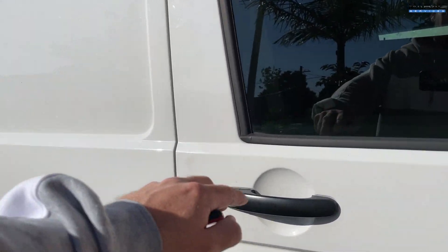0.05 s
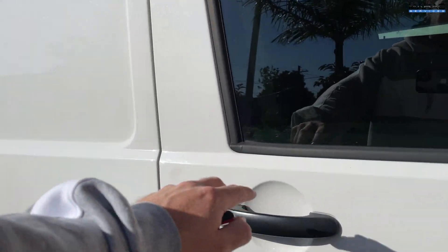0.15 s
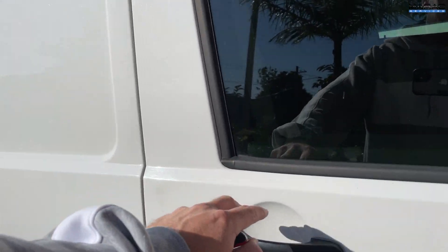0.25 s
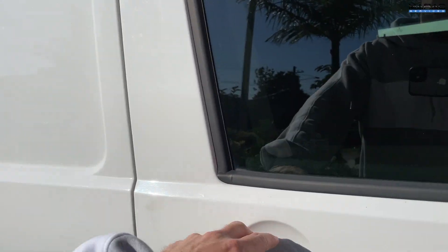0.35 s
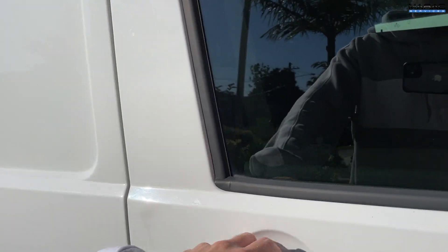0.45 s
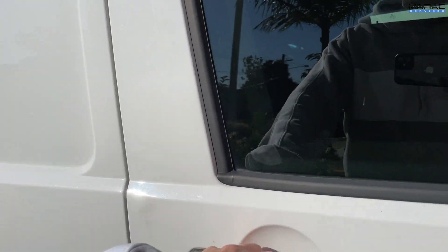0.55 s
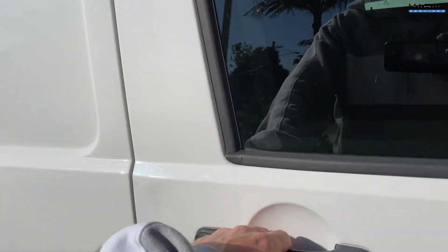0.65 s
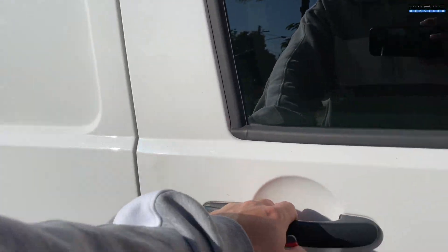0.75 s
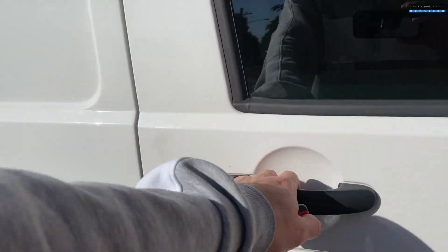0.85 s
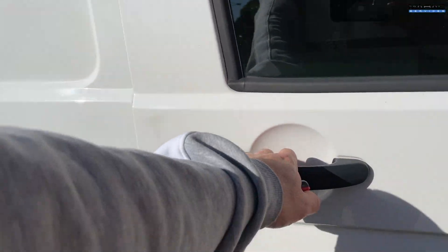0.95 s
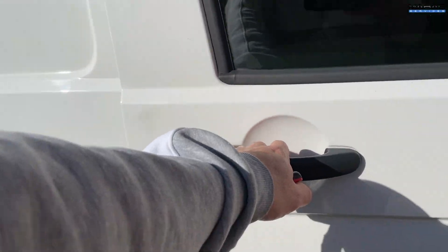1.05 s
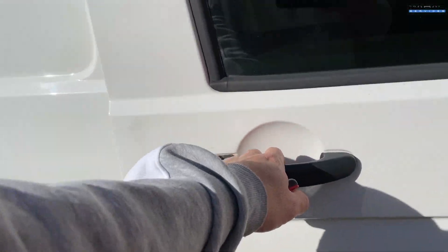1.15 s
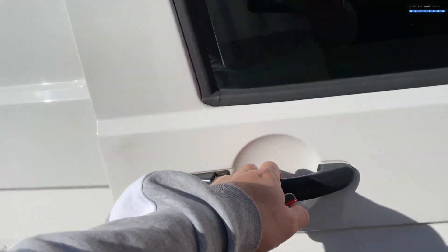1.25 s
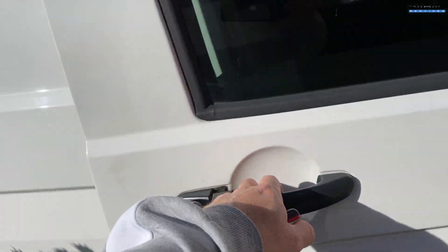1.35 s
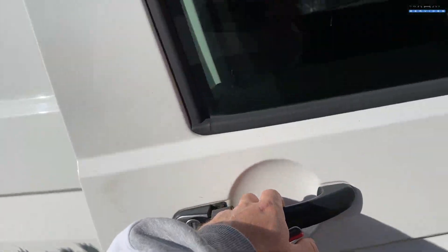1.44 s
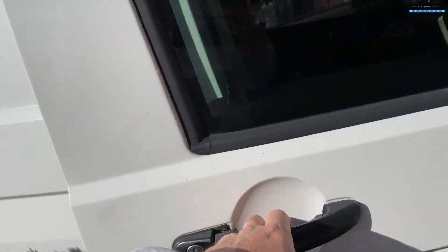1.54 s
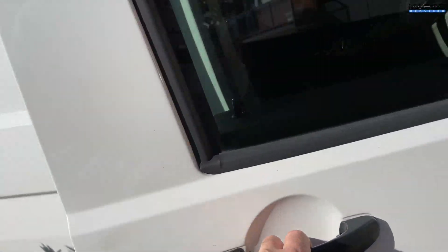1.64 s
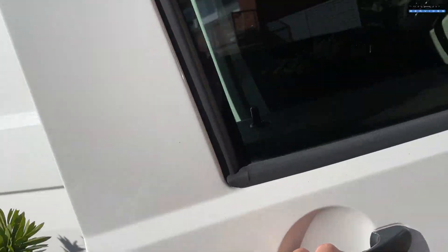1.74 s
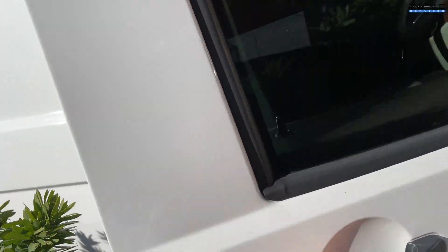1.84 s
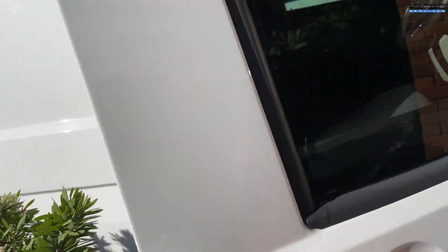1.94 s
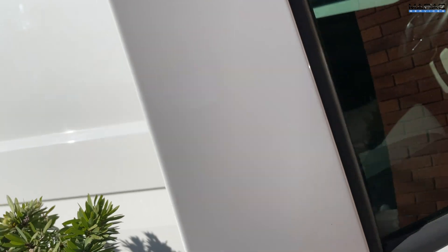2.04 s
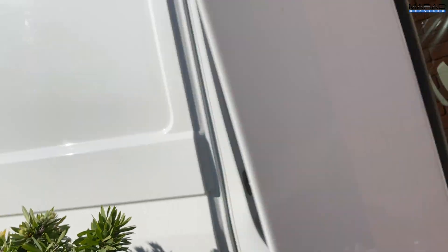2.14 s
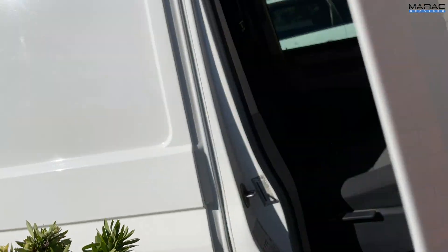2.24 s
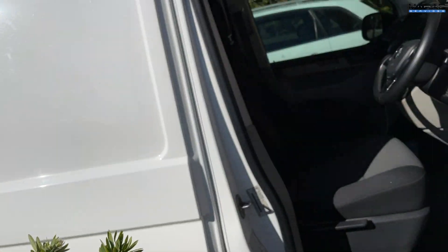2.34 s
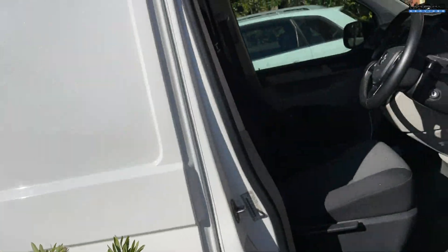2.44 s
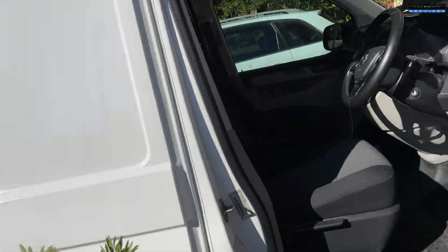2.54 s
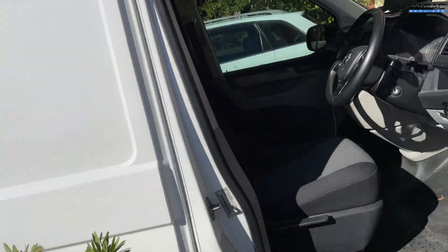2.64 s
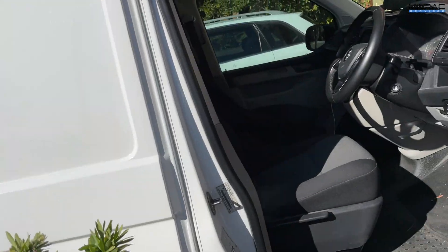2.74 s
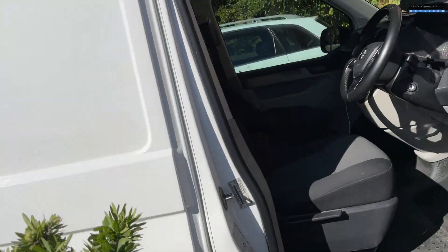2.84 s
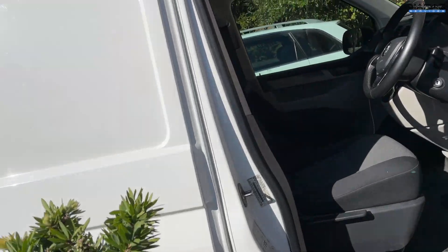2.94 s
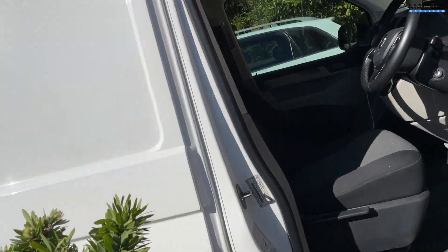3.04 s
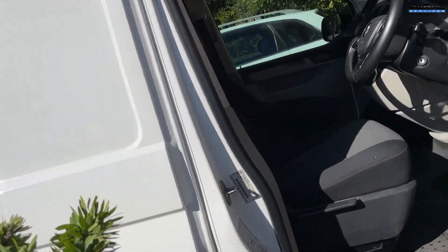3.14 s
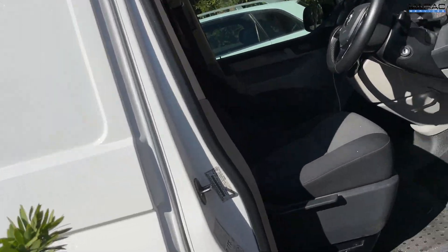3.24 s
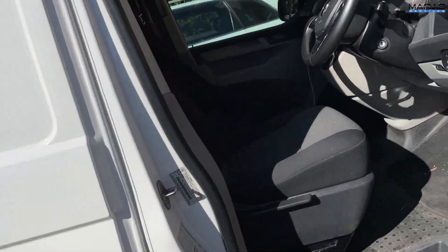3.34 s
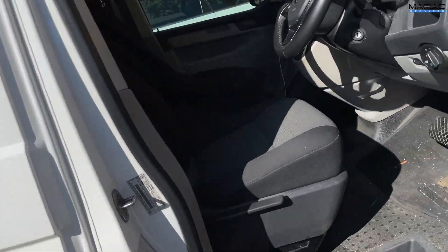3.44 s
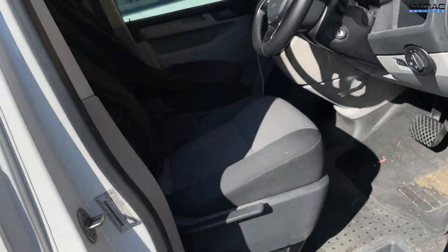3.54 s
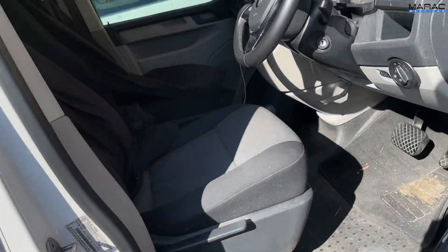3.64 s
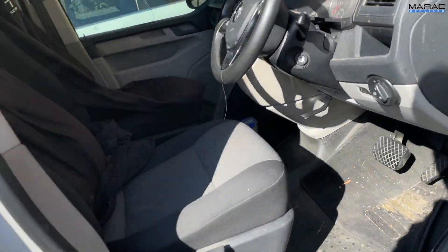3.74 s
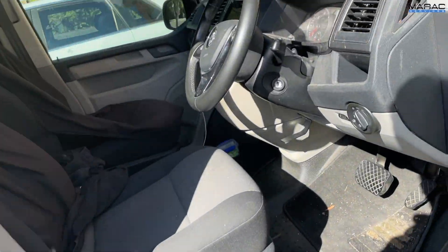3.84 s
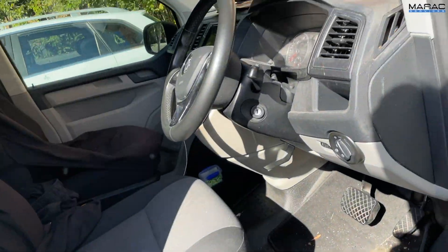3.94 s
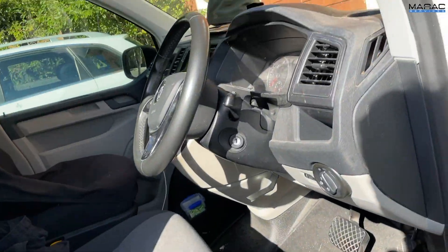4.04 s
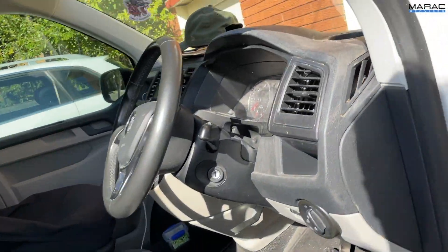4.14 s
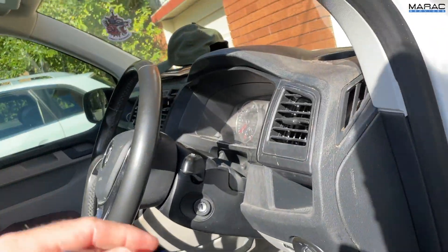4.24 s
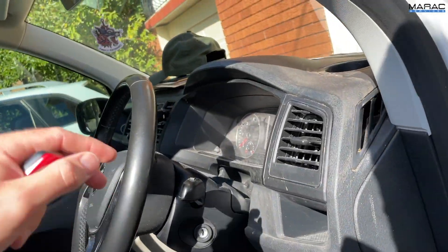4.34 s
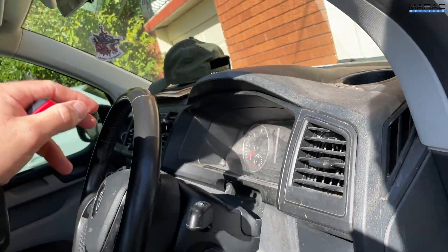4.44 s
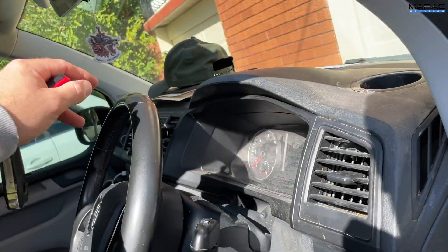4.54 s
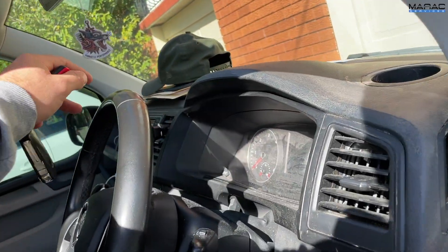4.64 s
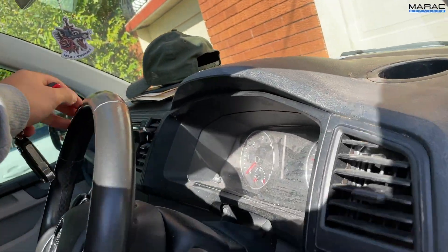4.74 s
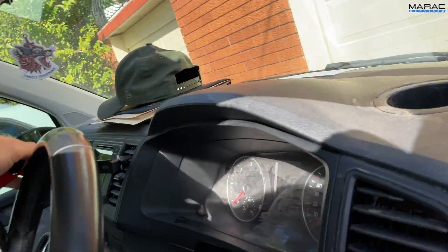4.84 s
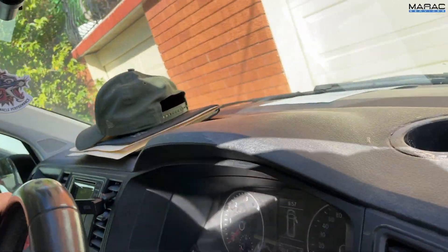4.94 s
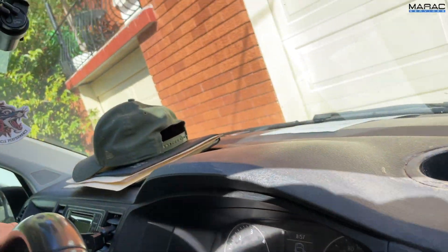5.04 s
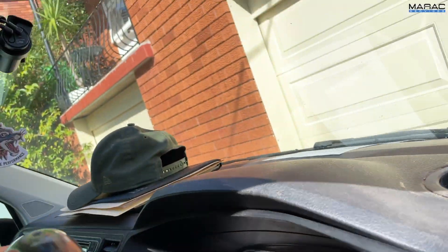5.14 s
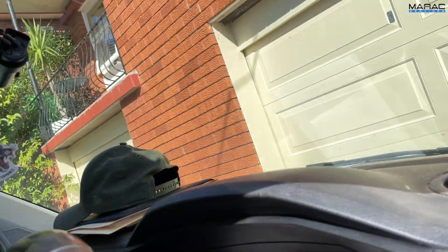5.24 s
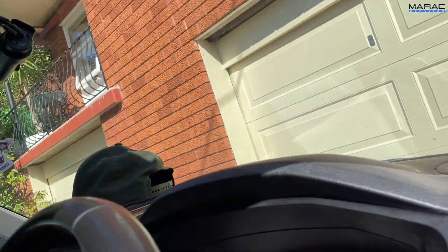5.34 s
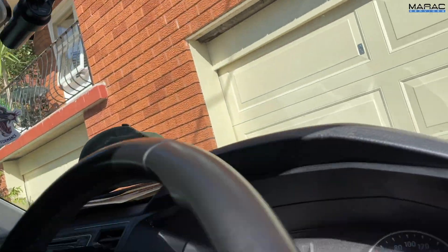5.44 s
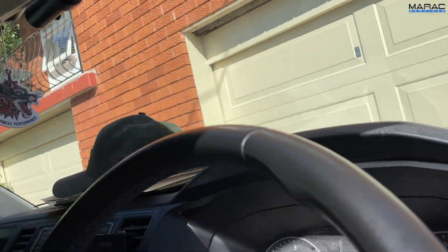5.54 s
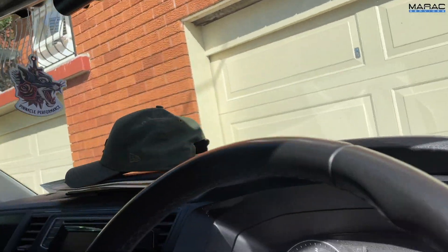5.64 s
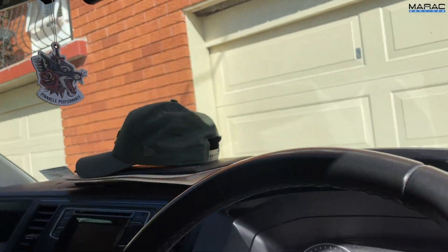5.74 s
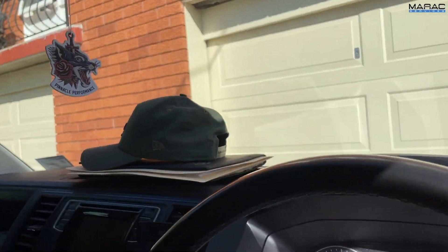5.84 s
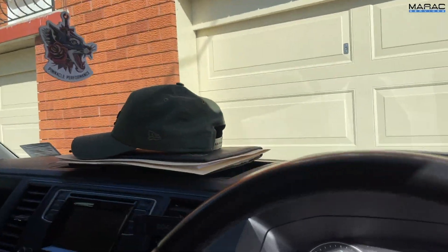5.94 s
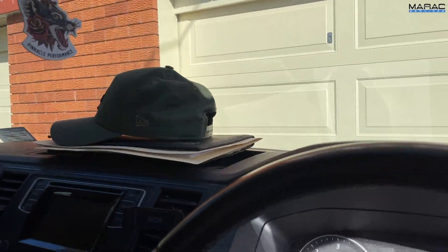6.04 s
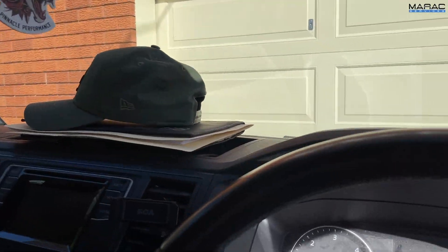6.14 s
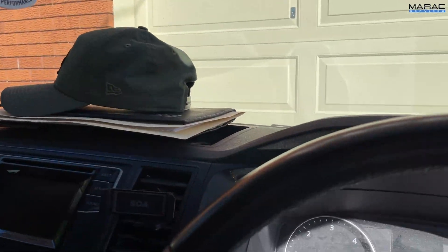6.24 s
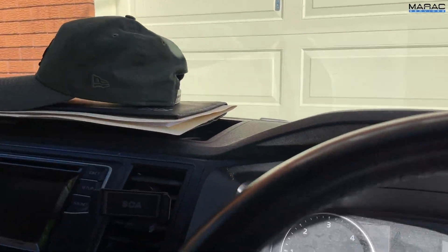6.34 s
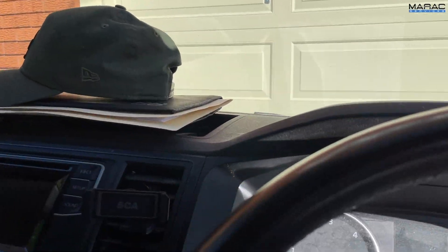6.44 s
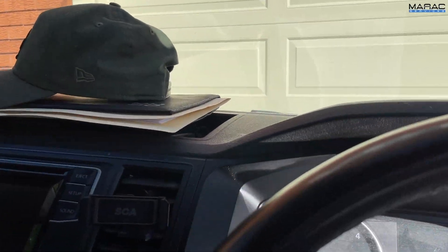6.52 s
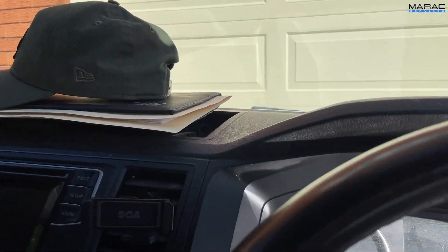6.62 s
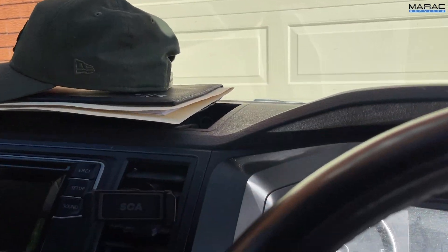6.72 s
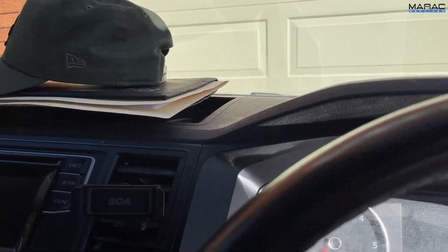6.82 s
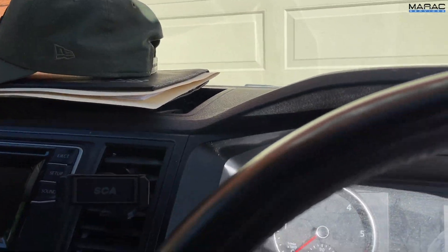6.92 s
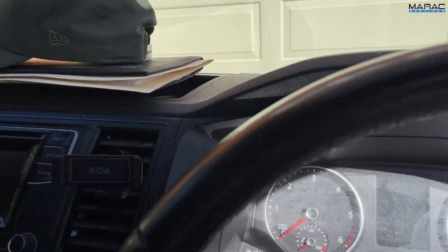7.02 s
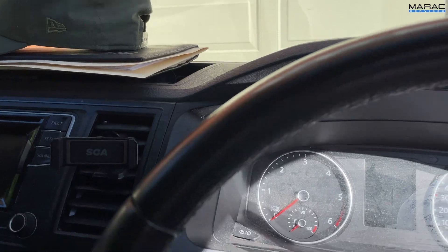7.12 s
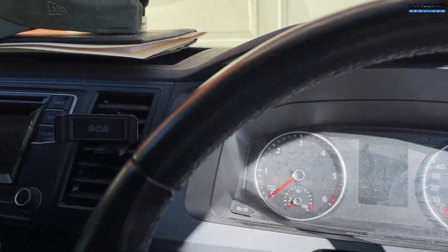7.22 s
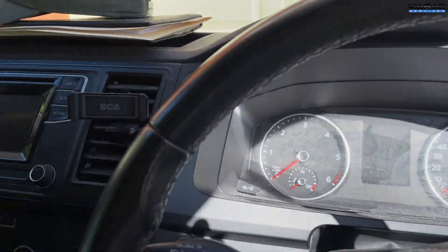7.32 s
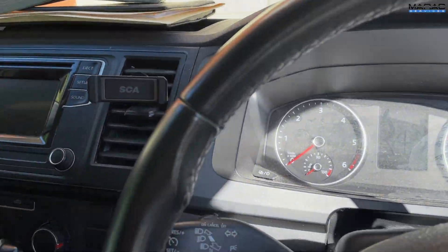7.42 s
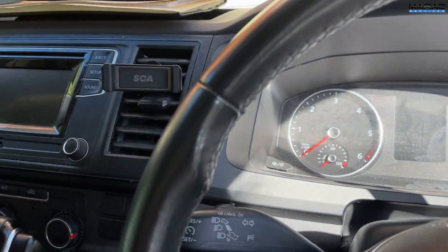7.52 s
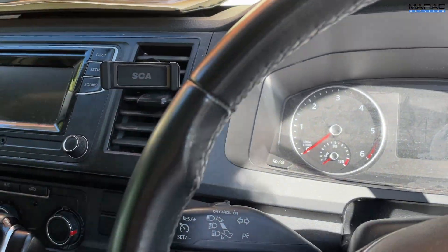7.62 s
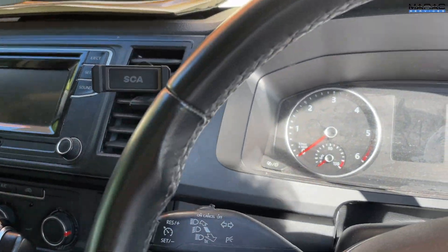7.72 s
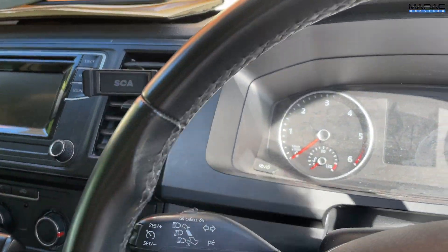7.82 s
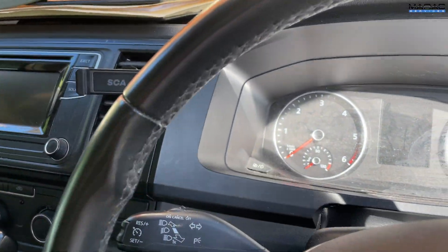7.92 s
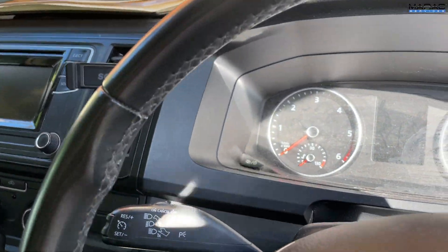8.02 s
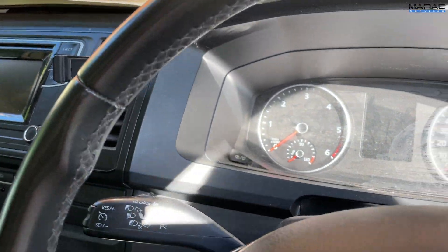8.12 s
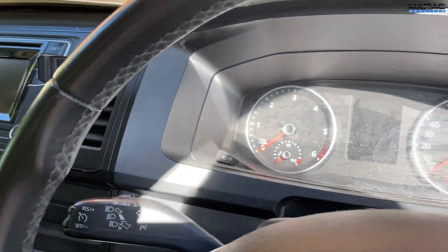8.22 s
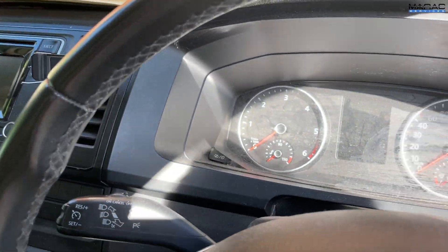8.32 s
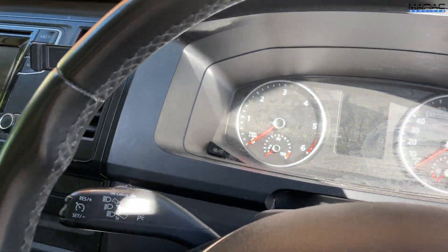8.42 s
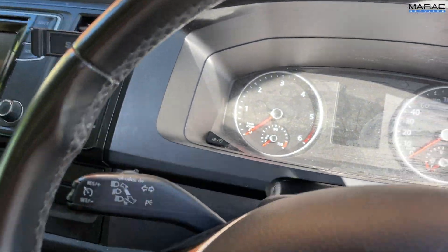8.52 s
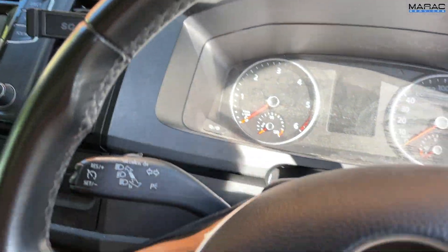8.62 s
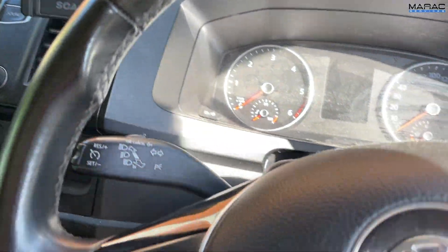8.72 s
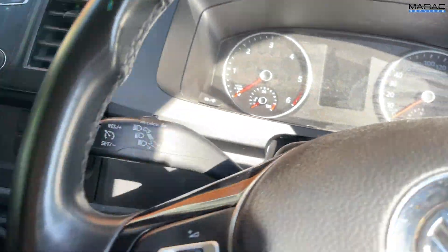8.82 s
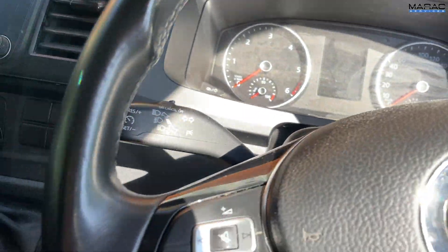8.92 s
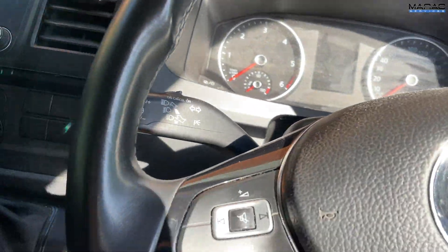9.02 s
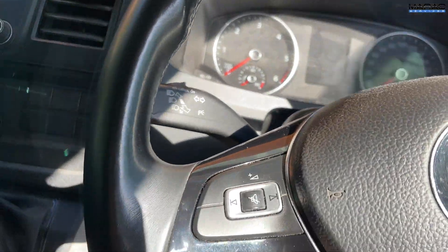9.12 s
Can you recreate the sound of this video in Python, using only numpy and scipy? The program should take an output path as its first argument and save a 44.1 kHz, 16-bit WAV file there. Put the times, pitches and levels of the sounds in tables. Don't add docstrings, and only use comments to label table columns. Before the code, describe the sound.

Van door latch clacks open, then knocks, a gritty scrape and loud thumps as someone climbs into the seat, with faint street noise and rustling cloth.

```python
import sys
import numpy as np
from scipy import signal
from scipy.fft import rfft, irfft, next_fast_len
from scipy.io import wavfile
from scipy.ndimage import uniform_filter1d

SR = 44100
rng = np.random.default_rng(int(sys.argv[2]) if len(sys.argv) > 2 else 0)


def undo_db(level):
    steps = np.asarray(level, float) / 20
    return 10 ** steps


def unload_audio(sound):
    columns = np.transpose(np.atleast_2d(sound))
    steps = np.round(np.clip(columns, -1, 1) * 32767)
    wavfile.write(sys.argv[1], SR, steps.astype(np.int16))


N = 404397
PADDED = next_fast_len(N + 4096)

# start_s [s], level_db [dB]
LATCH_CONTACTS = [
    (0.896, -24),
    (0.9, -4.5),
    (0.9028, -7),
    (.907, -14),
    (0.9098, -15.5),
    (0.9224, -29),
]
# pitch_hz [Hz], level_db [dB], t60_s [s]
DOOR_MODES = [(81.4, -9.5, 0.099), (200, -12.5, 0.22), (400, -8.5, 0.085), (440, -9, 0.066),
              (674, -11, 0.073), (743, -10, 0.09), (2180, -22, 0.1), (1130, -22.5, 0.034),
              (1350, -15.5, 0.04), (1706, -23, 0.12), (2371, -21, 0.15), (2585, -23, 0.11)]
# pitch_hz [Hz], level_db [dB], t60_s [s]
DOOR_TAIL = [(57.5, -25.5, 0.5), (150, -21.5, 0.45), (430, -23, 0.33), (980, -18.5, 0.051),
             (2500, -17, 0.053), (5000, -39.5, 0.11), (9000, -62, .1)]

# start_s [s], pitch_hz [Hz], level_db [dB], t60_s [s]
SINGLE_SWINGS = [(.9015, 75, -11, .1), (.8975, 388, -8, .06), (.905, 452, -14, .04), (.921, 194, -18, .15),
                 (.945, 83, -18, .25), (4.9735, 120, -4, 0.031), (1.934, 390, -18, .06),
                 (1.933, 850, -24, .06), (2.1, 320, -31, .07), (.558, 200, -34, 0.11),
                 (2.777, 116.5, -26, 0.06), (3.05, 326, -23.5, 0.11), (4.475, 170, -30.5, 0.09),
                 (5.483, 90, -24.5, 0.1), (5.632, 90, -22, 0.09), (6.757, 990, -36, .04),
                 (7.095, 82, -36, 0.16), (7.924, 414, -42, 0.039), (8.665, 320, -19.5, 0.053),
                 (8.912, 89.5, -27.5, .12), (9.104, 190, -21, 0.062), (0.55, 480, -31.5, 0.11),
                 (8.662, 760, -14.5, 0.045), (8.683, 760, -15, 0.04), (2.771, 1550, -24.5, 0.028),
                 (2.772, 1750, -28.5, 0.033), (3.76, 560, -12, 0.06), (1.681, 390, -29, 0.06),
                 (3.392, 290, -22, .13), (4.684, 150, -18, .03), (5.2, 520, -28, .04), (5.35, 550, -29, .06),
                 (5.093, 520, -17, .04), (1.004, 750, -25, .045), (4.365, 500, -26, .045),
                 (4.373, 162, -30, .11), (4.469, 426, -24, 0.049), (3.451, 633, -11, 0.036),
                 (.538, 1650, -30.5, .03), (3.331, 480, -9, .025), (9.097, 850, -31, .06),
                 (8.835, 1500, -42, 0.071), (8.138, 1990, -40, .03)]

# start_s [s], peak_db [dB], body_hz [Hz], upper_db [dB re peak], crack_db [dB re peak]
PANEL_KNOCKS = [(0.427, -25.5, 144.6, -20.5, -33), (0.811, -35.5, 154.4, -12, -13.5),
                (1.324, -29, 102, -17, -28), (1.503, -13.5, 225, -15.5, -29.5),
                (1.683, -24.5, 216, -21.5, -45), (1.959, -21.5, 116.5, -8.5, -56.5),
                (2.469, -27.5, 464, -4, -15.5), (4.255, -31.5, 295, -5, -27), (4.552, -29, 259, -11.5, -37),
                (4.762, -27, 193, -4.5, -10.5), (5.331, -22, 166.4, -16, -38), (6.552, -30, 159, -17, -26),
                (8.27, -34, 608, -7, -4.5), (8.662, -12, 520, -12, -28)]
# start_s [s], peak_db [dB], body_hz [Hz], upper_db, crack_db [dB re peak]
TRIM_KNOCKS = [(0.039, -34.5, 215, -31, -34.5), (0.537, -28, 414, -5, -7.5), (1.488, -15, 110, -48, -54),
               (1.519, -17, 253, -10.5, -47), (1.935, -10, 252, -12, -24), (2.674, -25, 555, -12, -27),
               (3.018, -22, 346, 2.5, -8), (3.052, -19.5, 334, -1, -14), (3.099, -24, 268, -7, -29),
               (3.387, -15, 302, -16, -18), (4.365, -19, 376, -13.5, -26.5),
               (4.467, -15, 478, -12.5, -24.5), (4.595, -25, 282, -11, -62), (4.664, -14, 344, -9, -13.5),
               (4.683, -19, 114, -29, -46.5), (5.239, -20.5, 310, -40, -48), (5.984, -26, 109, -8, -11),
               (6.063, -21.5, 150, -35, -29), (8.11, -25.5, 109.5, -18, -30), (8.139, -30, 117, -3, -13),
               (8.862, -22.5, 257, -10, -27), (8.997, -11.5, 297, -21.5, -29),
               (9.1, -15, 168.5, -13, -27.5), (9.138, -26, 228, -3.5, -9.5)]
# start_s [s], peak_db [dB], body_hz [Hz], upper_db [dB re peak], crack_db [dB re peak]
DAMPED_KNOCKS = [(1.006, -18, 111, -14, -34), (2.772, -16, 131, -10.5, -23.5), (3.331, -7.5, 375, -25, -23),
                 (3.355, -4.5, 324, -13, -26), (3.451, -13, 500, -17, -35), (3.553, -8.5, 470, -10, -24),
                 (3.76, -3, 630, 0, -14), (3.787, -10, 420, -1.5, -16), (4.033, -18.5, 150, -23, -40),
                 (4.968, -19, 297, -46, -59.5), (5.093, -10, 352, -39, -35), (5.2, -23.5, 137, -5.5, -34),
                 (5.269, -21, 260, -11.5, -26), (5.416, -22.5, 538, -17, -35),
                 (5.539, -13.5, 114.5, -16.5, -40), (8.684, -9.5, 743, -10, -20),
                 (8.83, -13, 117, -15, -34), (9.033, -15, 209, -40, -45)]
# start_s [s], peak_db [dB], body_hz [Hz], upper_db, crack_db [dB re peak]
BOUNCES = [(.575, -30.5, 414, -17, -25), (.615, -47, 300, -17, -27), (.876, -29.5, 253, -30, -45.5),
           (2.435, -40.5, 507, 1, -9), (2.595, -36, 400, -10, -14), (2.943, -36.5, 700, -8, -12),
           (3.256, -29, 420, -19, -20), (3.29, -13.5, 355, -22, -28), (3.31, -14, 504, -22, -26),
           (3.489, -16.5, 714, -10, -14), (3.59, -23, 303, -3, -25), (3.636, -26.5, 260, -2, -12),
           (3.669, -24.5, 290, -5, -19), (3.701, -22.5, 301, -14, -27), (5.1, -19, 485, -7, -30),
           (8.71, -27.5, 400, -11, -30), (8.815, -32, 201, -8, -23), (9.01, -18.5, 330, -17, -34)]
PANEL_T60_S, TRIM_T60_S, DAMPED_T60_S, BOUNCE_T60_S = 0.13, 0.09, 0.042, 0.07
TAIL_DB, TAIL_STRETCH = -24, 1.8

# start_s [s], body_db [dB], grit_db [dB]
SCRAPE_STROKES = [
    [(3.272, -41, -57), (3.287, -20.5, -25), (3.45, -37, -67)],
    [(3.47, -71, -59), (3.494, -25.5, -41.5), (3.52, -60, -77)],
    [(3.634, -28.5, -58), (3.682, -33, -54), (3.74, -40, -75)],
]
# pitch_hz [Hz], width_hz [Hz], level_db [dB]
SILL_MODES = [(275, 21.5, 9), (350, 74, 9.5), (500, 40, 2.5), (584, 170, 11), (707, 130, 6.5),
              (1404, 600, 0)]
# pitch_hz [Hz], width_hz [Hz], level_db [dB]
GRIT_MODES = [(2270, 490, 19.5), (3500, 450, 5), (5200, 200, 3.5)]

# start_s [s], pitch_hz [Hz], level_db [dB], t60_s [s]
KEY_PARTIALS = [
    (.49, 2900, -61, .08),
    (1.043, 2080, -50, 0.08),
    (3.58, 2550, -43, 0.05),
    (3.765, 274.6, -21, 0.12),
    (3.768, 14700, -30, .08),
    (3.787, 14500, -20, 0.04),
    (3.789, 13200, -29, 0.048),
    (6.553, 500, -35, .05),
    (6.371, 2980, -45, .025),
]

# start_s [s], peak_db [dB], pitch_hz
# [Hz]
DRY_TICKS = [(0.5365, -29.5, 3240), (0.7457, -41, 2490), (0.8999, -16.5, 2660), (1.0222, -39.5, 2220),
             (1.5, -42, 2100), (1.7553, -31, 3630), (1.93, -41, 2490), (2.5725, -36, 3370),
             (2.9026, -32.5, 2980), (3.0507, -33.5, 2480), (3.1986, -35.5, 2410), (3.3867, -29, 3100),
             (3.477, -40, 3700), (3.5618, -32, 4500), (3.7878, -22, 3580), (4.8666, -34.5, 3130),
             (4.932, -35.5, 5440), (5.354, -30, 2570), (5.6415, -28.5, 2600), (6.3723, -32, 2940),
             (8.972, -37, 3290), (9.1375, -36, 2870),
             (.0648, -47.5, 2840), (.174, -42, 2380), (0.4247, -39, 1400), (0.7984, -37, 2300),
               (1.094, -41, 2700), (1.305, -57, 2000), (1.33, -46, 2950), (1.581, -39, 8400),
               (1.591, -45, 9000), (1.603, -44, 9000), (1.6182, -42, 4780), (1.658, -53, 4500),
               (1.724, -46, 5120), (1.88, -40, 9500), (2.3096, -47, 2170), (2.355, -40, 2310),
               (2.434, -45, 2300), (2.4947, -42.5, 5000), (2.505, -46, 3500), (2.519, -42, 2500),
               (2.584, -39, 4000), (2.6918, -47, 4330), (2.955, -45, 3000), (3.3, -30, 5200),
               (3.316, -29, 2400), (3.328, -34, 5200), (3.397, -37, 3020), (3.4855, -38, 2080),
               (3.495, -33, 1500), (3.6157, -47, 3780), (3.636, -42, 1400), (3.6571, -41, 1500),
               (3.768, -35, 9000), (3.772, -28, 2000), (4.77, -33, 8500), (4.78, -48, 2000),
               (5.9863, -44, 2030), (7.0863, -47, 3380), (8.2092, -40, 2000), (8.8104, -49, 3260),
               (8.92, -38.5, 2500), (9.0249, -41, 3200)]
# start_s [s], peak_db [dB], pitch_hz [Hz]
SCUFFS = [(0.816, -40, 2660), (1.109, -40, 2790), (2.326, -35.5, 2220), (3.0234, -37, 2550),
          (3.2844, -28, 2500), (3.7574, -30.5, 2630), (4.662, -28, 3040), (4.7506, -35, 3300),
          (5.0952, -37.5, 3100), (7.0757, -53, 3360), (8.1993, -40.5, 2990), (8.2703, -35, 5100),
          (8.6604, -37, 3850), (8.6847, -43, 3250)]
TICK_T60_S, SCUFF_T60_S = 0.026, 0.073

# start_s [s], end_s [s], pitch_hz [Hz], level_db [dB]
RUBBING_TONES = [(.42, .45, 5720, -65), (.46, .52, 5720, -66), (.42, .455, 4070, -67),
                 (.45, .535, 4090, -66), (4.595, 4.66, 1350, -50), (4.39, 4.43, 1600, -59),
                 (4.44, 4.465, 2100, -59), (5.31, 5.335, 1850, -54), (7.23, 7.25, 700, -62),
                 (7.245, 7.27, 950, -62), (8.17, 8.2, 3200, -62), (8.3, 8.34, 3600, -70)]

# pitch_hz [Hz], share [0-1]
LIKENESS = [(40, .85), (600, .5), (1200, .3), (2800, .6), (4800, .7), (6000, .5), (7000, .999),
            (8200, .999), (9200, .8), (10300, .999), (11800, .999), (12800, .7), (13700, .9995)]
# pitch_hz [Hz], left_lead [half cycles]
PORTS_AHEAD = [(0, 0), (5200, 0), (7000, -1), (8000, -1), (10300, -2), (11800, -2), (13700, -3),
               (17000, -3)]
# pitch_hz [Hz], left_lead [half cycles]
PORTS_BESIDE = [(0, 0), (300, -.27), (550, -.55), (900, -.75), (1700, -.68), (1950, -1.32), (2500, -1.45),
                (3500, -1.8), (4500, -2)]
# pitch_hz [Hz], left_db [dB towards the left port]
LEAN_AHEAD = [(40, 0), (400, .7), (1400, 0), (3500, 1.2), (6000, 1), (8000, 0)]
# pitch_hz [Hz], left_db [dB towards the left port]
LEAN_BESIDE = [(40, 0), (300, -1.3), (1200, -1.8), (2300, -.3), (4000, 1.2), (6000, 1), (8000, 0)]
# start_s [s], end_s [s]
BESIDE_SPANS = [
    (1.9, 5.22),
    (8.0, 9.17),
]

# start_s [s], length_s [s], rumble_db [dB], seat_db [dB re rumble]
HEAVES = [(0, 0.31, -48, 1.5), (.42, 0.35, -43, -3.5), (.89, 0.35, -33.5, -10.5), (1.42, 0.65, -39, -6),
          (1.9, 0.34, -40, 1), (2.66, 0.28, -43, -2), (3.0, 0.43, -45, 5.5), (3.26, 0.23, -37.5, 10),
          (3.5, 0.42, -44, 1.5), (3.95, 0.21, -49, -25), (4.55, 0.82, -36, -10.5), (5.0, 0.36, -35, -3),
          (5.3, 0.43, -37, -7), (7.05, 0.11, -53.5, -25), (7.62, 0.54, -57, 3), (8.06, 0.18, -46, -1.5),
          (8.43, 0.43, -52, 8.5), (8.65, 0.17, -37.5, 1.5), (9.0, 0.97, -34, -4)]
# start_s [s], length_s [s], cloth_db [dB], street_range_db [dB re cloth]
RUSTLES = [(.05, 0.59, -62.5, 5), (.9, 0.053, -50, 20.5), (1.1, 0.11, -60, 4), (1.5, 0.77, -59.5, 0),
           (2.15, 0.52, -70, -6), (2.79, 0.25, -62.5, -4), (3.18, 0.48, -54.5, -3), (3.74, 0.093, -54, 8),
           (3.86, 0.3, -53.5, 2), (4.25, 0.82, -61, 3.5), (5.04, 0.2, -51, 3), (5.27, 0.18, -55, 0.5),
           (5.48, 0.081, -54.5, 7), (5.69, .04, -65, 14), (5.73, 0.18, -64.5, 9), (7.2, 0.098, -68, 8.5),
           (8.3, 0.047, -64.5, 6), (8.415, 0.025, -71.5, 10), (8.83, 0.079, -72, 19),
           (9.095, .07, -66.5, 15), (.6, 0.039, -57, 3), (2.33, 0.029, -60, 6), (7.075, 0.043, -59.5, -0.5),
           (7.29, 0.18, -71.5, 16), (7.62, 0.59, -68, 13), (8.08, 0.2, -67.5, 12), (8.76, 0.61, -64, 2),
           (8.9, 0.28, -64.5, 6.5)]
# peak reached, hold ends [shares of length], level at both ends [dB]
HEAVE_SHAPE, RUSTLE_SHAPE = (0.098, 0.48, -8), (0.29, 0.51, -8.5)
# start_s [s], level_db [dB]
STREET = [(0, -64.5), (2.2, -57.5), (4.9, -61.5), (5.68, -57), (5.91, -56), (6.38, -52.5), (6.83, -53),
          (6.93, -58.5), (6.99, -68), (7.06, -76), (7.12, -59.5), (7.19, -68), (7.33, -63.5), (7.52, -72),
          (9.17, -59.5)]
# level_db [dB at a street of -60 dB], swing_share [ratio]
STREET_SHARES = [(-51.5, 0.22), (-55.5, 0.8), (-62.5, 1.54), (-71, 1.1)]
# pitch_hz [Hz], density_db [dB per Hz]
AIR = [(25, 1.5), (64, 5.5), (200, -9), (911, -21), (2000, -26.5), (3340, -32.5), (7920, -34), (9570, -31),
       (10700, -86), (13200, -44.5), (16000, -35)]
CRACKLE_PER_S, CRACKLE_DB, CRACKLE_SPREAD_DB = 74, 12, 4.5
# from s to s, comb spacing, share of the echo
PASSING_S, WALL_COMB_HZ, WALL_ECHO = (6.0, 6.95), 495, 0.35

# low_hz [Hz], high_hz [Hz], level_db [dB], share [of short spans]
FLICKER_BANDS = [(6190, 11000, -8, .35), (15060, 15900, -2.5, 0.6)]


def latch():
    out = np.zeros(N)
    chances = rng.uniform(-0.84, 1, (len(LATCH_CONTACTS), len(DOOR_MODES)))
    for (s, db), chance in zip(LATCH_CONTACTS, chances):
        for (hz, mode_db, t60), off in zip(DOOR_MODES, chance):
            t, fall = fading(0.36 * t60, rise=0.0003)
            strength = off + 0.5 * np.sign(off)
            add(out, s, undo_db(db + mode_db + 9) * strength * fall * np.sin(2 * np.pi * hz * t))
    for hz, db, t60 in DOOR_TAIL:
        t, fall = fading(t60, rise=0.0036)
        add(out, 0.899, undo_db(db) * fall * rms_one(band(burst(len(t)), hz / 1.46, hz * 1.43)))
    return out


def swings():
    out = np.zeros(N)
    for s, hz, db, t60 in SINGLE_SWINGS:
        t, fall = fading(t60, rise=0.26 / hz)
        add(out, s, -undo_db(db) * fall * np.sin(2 * np.pi * hz * t))
    return out


def knocks():
    out, upper_hz = np.zeros(N), np.geomspace(430, 1080, 6)
    kinds = [(PANEL_KNOCKS, PANEL_T60_S), (TRIM_KNOCKS, TRIM_T60_S),
             (DAMPED_KNOCKS, DAMPED_T60_S), (BOUNCES, BOUNCE_T60_S)]
    hits = [(*row, t60) for rows, t60 in kinds for row in rows]
    chances = rng.normal(size=(len(hits), 2, 9))
    not_first = np.arange(9) > 0
    for (s, db, hz, upper_db, crack_db, t60), chance in zip(hits, chances):
        pitches = np.r_[hz * np.array([1, 1.4, 0.65]), upper_hz]
        pitches = pitches * (1 + 0.063 * chance[0] * not_first)
        gains = undo_db(db + np.r_[-4, -8, -9, np.full(6, upper_db - 5)])
        gains = gains * (1 + 0.36 * chance[1] * not_first) * np.sign(chance[0])
        for pitch, gain in zip(pitches, gains):
            rise = (0.61 + 0.7 * (pitch < 1.5 * hz)) / pitch
            t, fall = fading(t60 * (300 / pitch) ** 0.5, rise)
            add(out, s - 0.001, gain * fall * np.sin(2 * np.pi * pitch * t))
        t, fall = fading(TAIL_STRETCH * t60, rise=0.0062)
        murmur = rms_one(band(burst(len(t)), 0.7 * hz, hz + 500))
        add(out, s, undo_db(db + TAIL_DB) * fall * murmur)
        t, fall = fading(0.6 * t60, rise=0.0002)
        fall = fall + 2.0 * fall ** 5
        crack = rms_one(band(burst(len(t)), 900, 2070))
        add(out, s, undo_db(db + crack_db - 1.5) * fall * crack)
    return out


def scrape():
    sizes = undo_db(4.5 * np.minimum(rng.exponential(1, N), 3)) * rng.choice([-1, 1], N)
    slips = (rng.random(N) < 1300 / SR) * sizes
    out, time = np.zeros(N), np.arange(N) / SR
    for k, modes in enumerate((SILL_MODES, GRIT_MODES)):
        rung = rms_one(sum(undo_db(db) * rms_one(band(slips, hz - width / 2, hz + width / 2))
                           for hz, width, db in modes))
        for stroke in SCRAPE_STROKES:
            inside_s = np.minimum(time - stroke[0][0], stroke[-1][0] - time)
            on = np.clip(inside_s / 0.0058, 0, 1)
            out += on * undo_db(in_time(stroke)[k]) * rung
    return out


def keys():
    out = np.zeros(N)
    for s, hz, db, t60 in KEY_PARTIALS:
        t, fall = fading(t60, rise=0.0006)
        pair = np.sin(2 * np.pi * hz * t) + 1.17 * np.sin(2.03 * np.pi * hz * t)
        add(out, s, undo_db(db) * fall * pair)
    return out


def ticks():
    out = np.zeros(N)
    contacts = [(*row, TICK_T60_S) for row in DRY_TICKS]
    contacts += [(*row, SCUFF_T60_S) for row in SCUFFS]
    for s, db, hz, t60 in contacts:
        t, fall = fading(t60, rise=0.0001)
        white = burst(len(t))
        puff = rms_one(band(white, 1330, 9100))
        puff = puff + 0.65 * rms_one(band(white, hz / 1.154, hz * 1.174))
        add(out, s, undo_db(db - 10) * (fall + fall ** 6) * puff)
    return out


def squeaks():
    out = np.zeros(N)
    for start, end, hz, db in RUBBING_TONES:
        t = np.arange(int((end - start) * SR)) / SR
        on = np.clip(np.minimum(t, t[-1] - t) / 0.012, 0, 1)
        width = 1 + 50 / hz + 0.07 * (hz < 2000)
        rough = band(rng.standard_normal(len(t)), hz / width, hz * width)
        rough = band(rough, hz / width, hz * width)
        add(out, start, on * undo_db(db - 3) * (rms_one(rough) + np.sin(2 * np.pi * hz * t)))
    return out


def ports(x, beside=0, gain=1):
    hz = np.fft.rfftfreq(PADDED, 1 / SR)
    lead = np.interp(hz, *np.transpose(PORTS_AHEAD))
    lead = lead + beside * np.interp(hz, *np.transpose(PORTS_BESIDE))
    turn = np.exp(0.5j * np.pi * np.outer([1, -1], lead))
    return irfft(gain * rfft(x, PADDED) * turn, PADDED)[:, :N]


def cabin(x):
    out = np.zeros((2, N))
    lags_s = 0.0032 + 0.024 * (np.arange(12) * np.sqrt(2) % 1)
    for k, lag in enumerate((lags_s * SR).astype(int)):
        out[k % 2, lag:] += undo_db(-400 * lag / SR) * (-1) ** (k // 2) * x[:-lag]
    return band(out, 250, 6500)


def background():
    levels_db, out, together = background_levels(), 0, drift(10)
    edges = 25 * 2 ** np.arange(0, 9.6, 0.5)
    snaps = crackle()
    white = diffuse(snaps), diffuse(snaps)
    for k, (low, high) in enumerate(zip(edges, edges[1:])):
        hz = np.sqrt(low * high)
        place = np.interp(np.log(hz), np.log([100, 350, 1400, 4500]), [0, 1, 2, 3])
        shares = np.maximum(1 - abs(place - np.arange(4)), 0)
        flicker_db = 1.7 * together + 1.4 * drift(9)
        level_db = shares @ (levels_db + [[-22], [-17], [-10], [-2]])
        gain = undo_db(at_hz(AIR, hz) + 43 + level_db + flicker_db)
        out = out + gain * band(white[k % 2], low, high)
    return out


def background_levels():
    time = np.arange(0, N, 64) / SR
    base_db, share = np.transpose(STREET_SHARES)[:, :, None]
    street_db = np.interp(time, *np.transpose(STREET))
    street = undo_db(2 * (base_db + share * (street_db + 60)))
    rumble, seat = swells(HEAVES, HEAVE_SHAPE, time)
    cloth, sleeve = swells(RUSTLES, RUSTLE_SHAPE, time)
    power = street + [rumble, seat, sleeve, cloth]
    return np.array([np.interp(np.arange(N) / SR, time, row) for row in 10 * np.log10(power)])


def swells(rows, shape, time):
    s, length, db, other_db = np.transpose(rows)[:, :, None]
    peak, hold, end_db = shape
    x = (time - s) / length
    away = np.maximum(np.maximum(1 - x / peak, (x - hold) / (1 - hold)), 0)
    power = undo_db(2 * (db + end_db * away))
    return power.sum(0), (power * undo_db(2 * other_db)).sum(0)


def diffuse(snaps):
    alike = at_hz(LIKENESS, np.fft.rfftfreq(PADDED, 1 / SR) + 1)
    white = rng.standard_normal((3, N))
    return ports(white[0] + snaps, gain=np.sqrt(alike)) + ports(white[1:], gain=np.sqrt(1 - alike))


def crackle():
    sizes_db = CRACKLE_DB + CRACKLE_SPREAD_DB * np.minimum(rng.exponential(1, N), 4)
    sizes = undo_db(sizes_db) * rng.choice([-1, 1], N)
    return sizes * (rng.random(N) < CRACKLE_PER_S / SR)


def drift(rate):
    r = np.exp(-80 * np.pi * rate / SR)
    slow = signal.lfilter([1], [1, -2 * r, r * r], rng.standard_normal(N // 40 + 2002))[2000:]
    return np.interp(np.arange(N) / 40, np.arange(len(slow)), rms_one(slow))


def burst(count):
    return rng.standard_normal(count)


def fading(t60, rise=0.00017):
    t = np.arange(int(t60 * SR) + 64) / SR
    return t, (1 - np.exp(-t / rise)) * undo_db(-60 * t / t60)


def band(x, low_hz, high_hz):
    edges_hz = [low_hz, min(high_hz, 0.45 * SR)]
    return signal.sosfilt(signal.butter(2, edges_hz, "band", fs=SR, output="sos"), x)


def rms_one(x):
    return x / np.sqrt(np.mean(x ** 2) + 1e-20)


def in_time(rows):
    s, *columns = np.transpose(rows)
    return [np.interp(np.arange(N) / SR, s, c) for c in columns]


def at_hz(points, hz):
    table_hz, values = np.transpose(points)
    return np.interp(np.log(hz), np.log(table_hz), values)


def add(out, s, x):
    i = int(s * SR)
    out[i:i + len(x)] += x[:N - i]


def scene():
    air = background()
    near = latch() + swings() + knocks() + scrape() + keys() + ticks() + squeaks()
    time, hz = np.arange(N) / SR, np.fft.rfftfreq(PADDED, 1 / SR) + 1
    beside = sum(1.0 * (time > start) * (time < end) for start, end in BESIDE_SPANS)
    beside = uniform_filter1d(beside, size=800)
    ahead_gain = undo_db(np.outer([1, -1], at_hz(LEAN_AHEAD, hz)))
    beside_gain = undo_db(np.outer([1, -1], at_hz(LEAN_BESIDE, hz)))
    placed = ports(near * (1 - beside), gain=ahead_gain)
    placed = placed + ports(near * beside, beside=0.97, gain=beside_gain)
    passing = 1.0 * (time > PASSING_S[0]) * (time < PASSING_S[1])
    echo = WALL_ECHO * uniform_filter1d(passing, size=4000)
    air = air + echo * np.roll(band(air, 300, 2800), int(SR / WALL_COMB_HZ), axis=1)
    return placed + undo_db(-14.0) * cabin(near) + air


def roll_off(x):
    return signal.sosfilt(signal.butter(12, 16500, fs=SR, output="sos"), x)


def record(dry):
    out = np.tanh(signal.sosfilt(signal.butter(2, 43, "high", fs=SR, output="sos"), dry))
    for low_hz, high_hz, db, share in FLICKER_BANDS:
        kept = np.repeat(rng.random(N // 1024 + 1) < share, 1024)[:N]
        kept = uniform_filter1d(1.0 * kept, size=1024)
        difference = band((dry[0] - dry[1]) / 2, low_hz, high_hz)
        difference = band(difference, low_hz, high_hz)
        out = out + undo_db(db) * kept * np.roll(difference, 300)
    mix = signal.sosfilt(signal.cheby2(12, 60, 16550, fs=SR, output="sos"), out)
    return roll_off(mix)


dry = scene()
out = record(dry)
unload_audio(out)
```